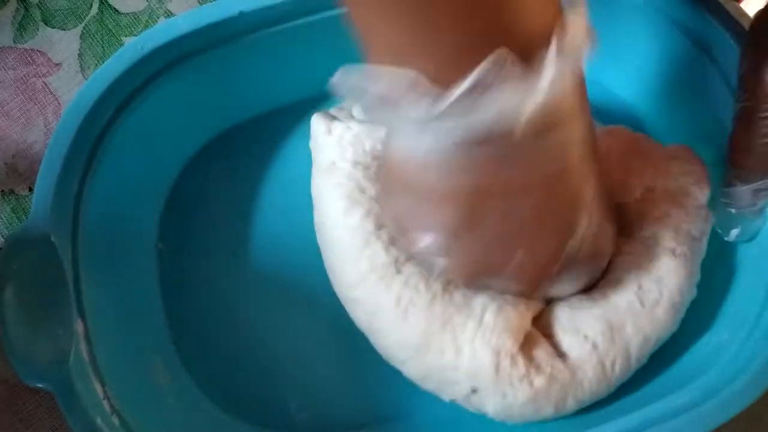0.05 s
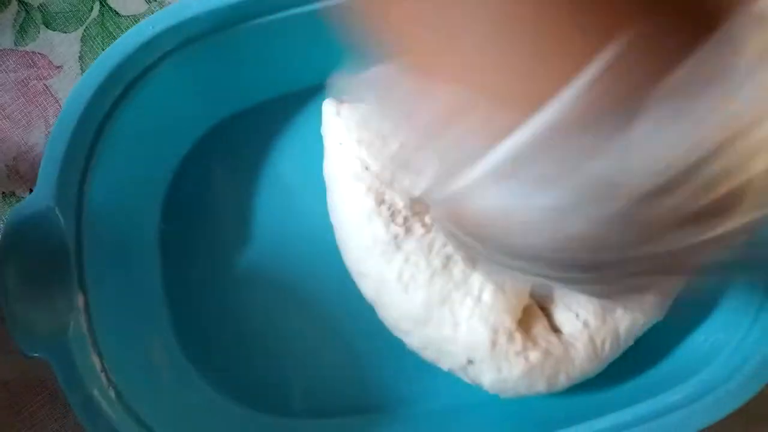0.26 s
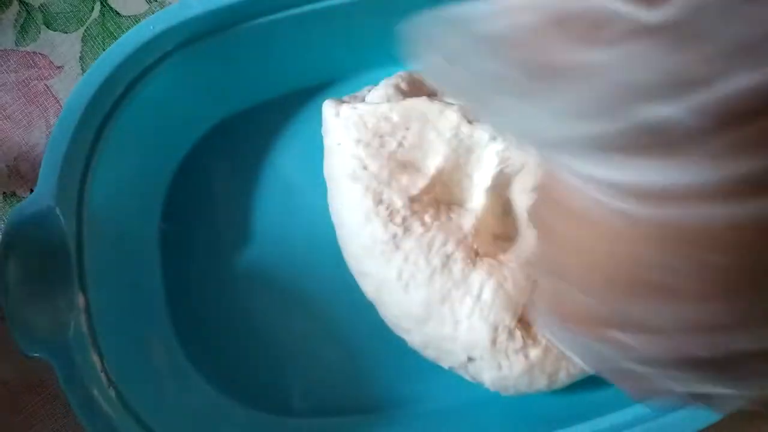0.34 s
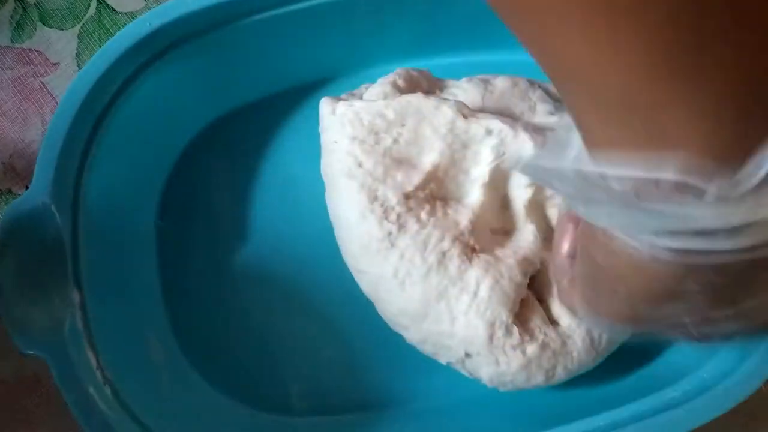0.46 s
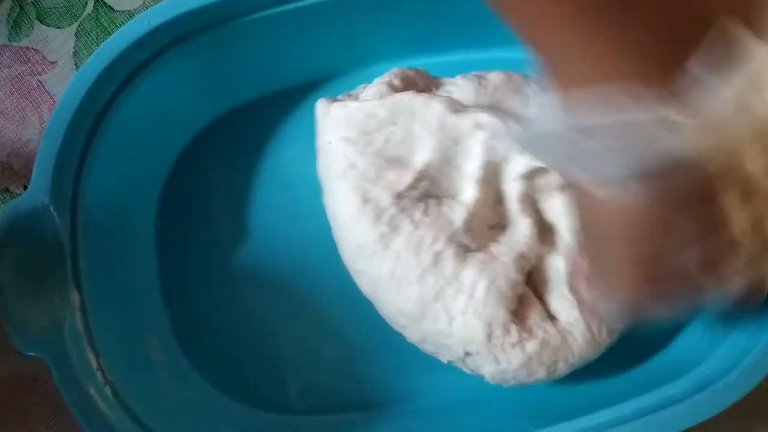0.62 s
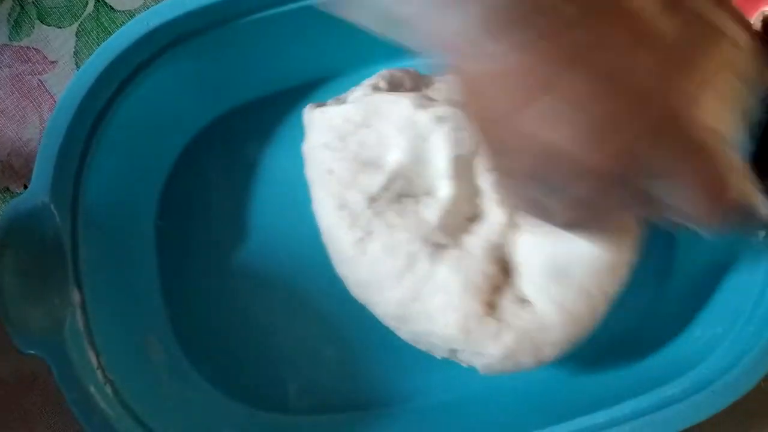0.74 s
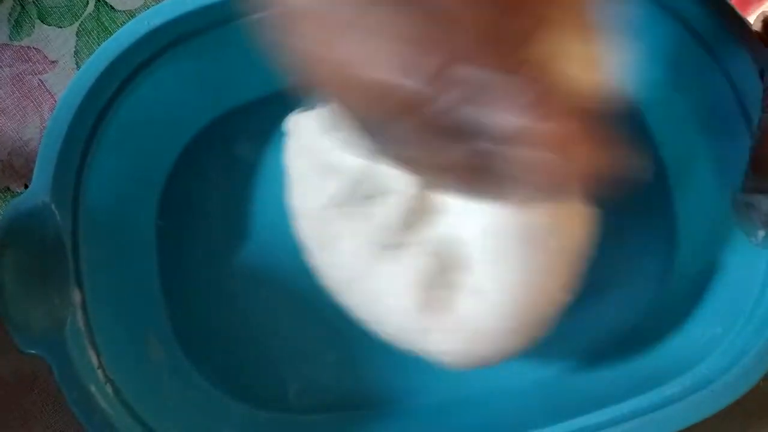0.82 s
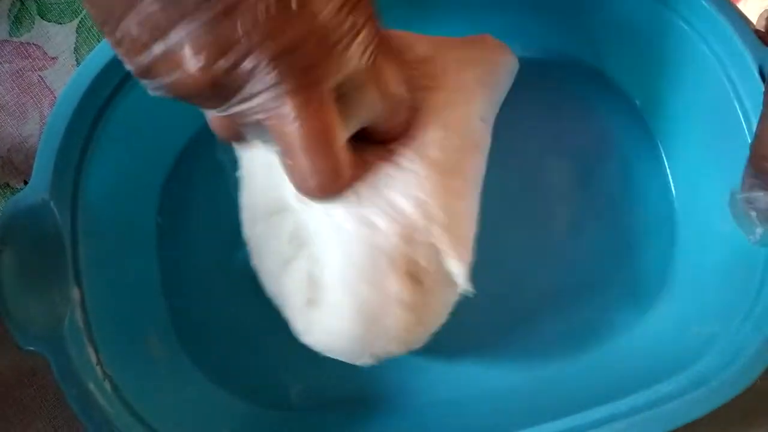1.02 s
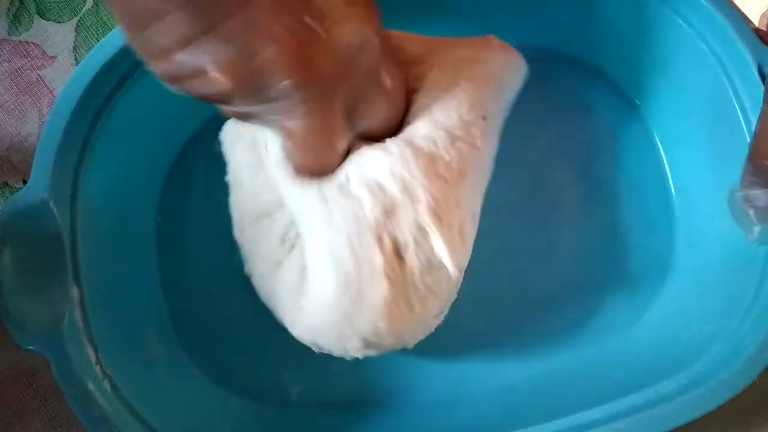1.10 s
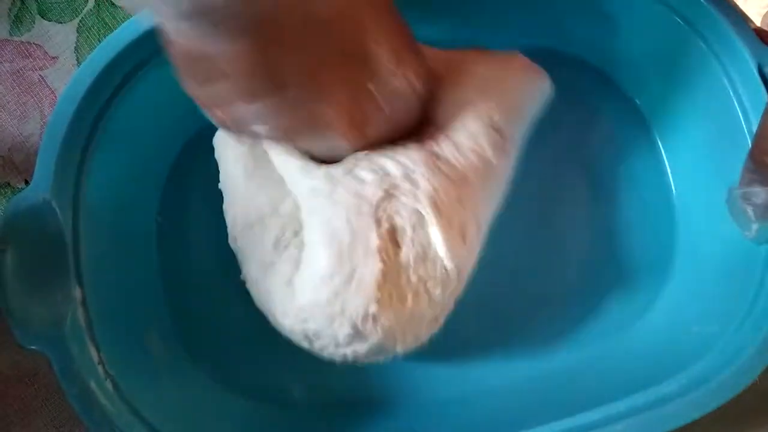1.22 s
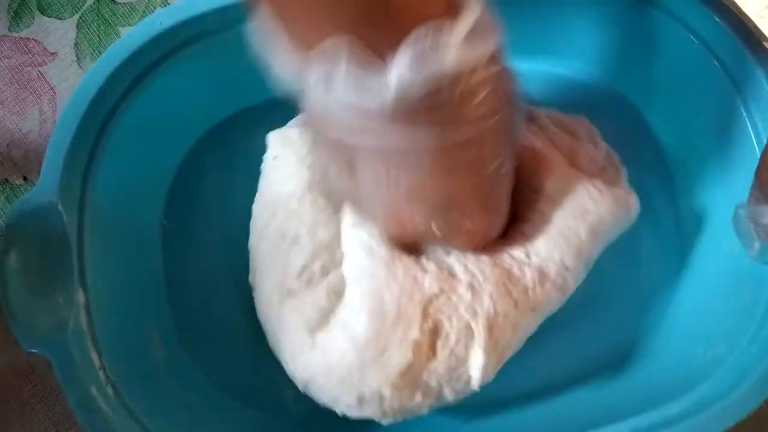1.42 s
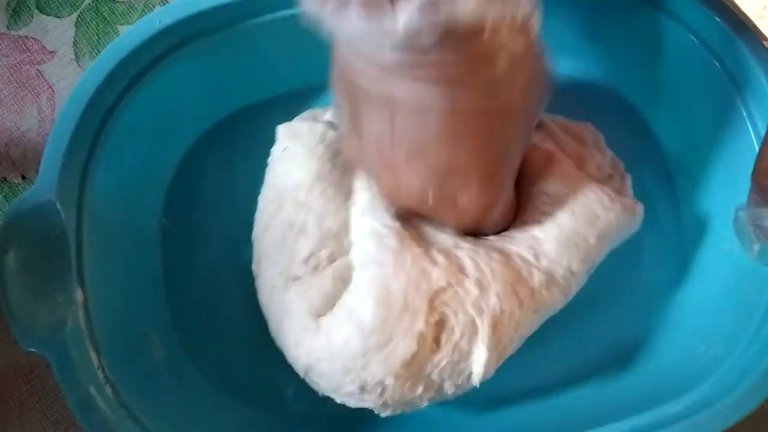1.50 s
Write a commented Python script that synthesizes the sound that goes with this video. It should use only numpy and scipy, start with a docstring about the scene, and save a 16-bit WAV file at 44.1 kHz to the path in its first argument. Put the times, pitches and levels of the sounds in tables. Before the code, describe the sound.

A gloved hand kneads dough, plastic rustling as the tub knocks hard, then softly.

```python
"""Kneading dough in a plastic tub

A hand in a thin plastic glove works dough close by, in a small quiet room. The glove crinkles as
its film buckles, and the tub knocks down twice, hard then softly, ringing in its damped modes.
The dough rubs by stick-slip friction, smacks as it comes unstuck and gives dully under the fist.
The glove rustles over it; a low rumble and a faint hum lie behind."""
import sys
import numpy as np
from scipy import signal
from scipy.fft import rfft, irfft
from scipy.io import wavfile

SR = 44100
rng = np.random.default_rng(int(sys.argv[2]) if len(sys.argv) > 2 else 0)


def generate_wav(signal):
    """Clip the signal to [-1, 1] and save it as 16-bit WAV at the path in sys.argv[1]."""
    frames = np.transpose(np.atleast_2d(signal))
    scaled = np.clip(frames, -1, 1) * 32767
    pcm = np.round(scaled).astype(np.int16)
    wavfile.write(sys.argv[1], SR, pcm)


N = 68355

# Levels are relative; a pan is the left level minus the right.
# tub contacts: (time [s], force level [dB], brightness [Hz], slap level [dB], settling delay [s])
KNOCKS = [(.2407, -5.5, 1130, -15.5, .0062), (.486, -34, 330, -65, .005), (0.5005, -14, 253, -42, .0102)]
# modes of the loaded tub: (frequency [Hz], level [dB], T60 [s])
TUB_MODES = [(75.2, -22, 0.1), (91.8, -27, 0.089), (109.6, -26.5, 0.14), (152.7, -21, 0.13),
             (221.4, -9.5, 0.12), (266, -16, 0.086), (305, -25.5, .04), (427.3, -27.5, 0.081),
             (512.3, -16, 0.052), (676.6, -13, 0.057), (767, -15.5, 0.038), (860, -34, 0.064),
             (993, -15.5, 0.025), (1370, -23, .022)]
# slap of the tub's bottom: (frequency [Hz], level [dB])
SLAP_SPECTRUM = [(200, -22.5), (600, -10.5), (1000, -2.5), (1400, -1.5), (1650, -21), (2100, -16),
                 (2700, -20.5), (3400, -35.5), (7000, -47), (15000, -61)]
# buckling runs of the glove: (time [s], level [dB], hold [s], low edge [Hz], high edge [Hz])
CRINKLES = [(.041, -45.5, 0.014, 202, 2040), (0.1217, -49, .001, 3980, 12000),
            (0.127, -30.5, 0.0015, 4860, 9500), (0.137, -40, 0.0031, 300, 4050),
            (0.144, -41.5, 0.0028, 1530, 7000), (.164, -40.5, 0.0034, 1000, 6800),
            (0.1956, -35, 0.0013, 4530, 11100), (0.2062, -30.5, 0.0079, 1250, 4940),
            (0.228, -36.5, 0.0026, 1490, 5460), (0.259, -53.5, 0.019, 3060, 9250),
            (0.94, -62.5, .01, 4540, 5470), (1.242, -57, 0.0053, 4450, 10700),
            (1.266, -58.5, .006, 4500, 9350), (1.356, -54, 0.00084, 3000, 7200),
            (1.3964, -42, 0.0013, 1830, 5040)]
# buckling film: (frequency [Hz], level [dB])
CRINKLE_SPECTRUM = [(300, -18), (1300, 8.5), (2000, 15.5), (2800, 8), (3500, 2), (5500, 2.5), (7700, 7.5),
                    (9200, 1.5), (11000, 0.5), (15000, -21)]
# envelope of the glove's rustle: (time [s], level [dB])
RUSTLE_ENVELOPE = [(0, -68.5), (.03, -81), (.055, -60), (.09, -49.5), (.14, -53), (.18, -51), (.225, -46.5),
                   (.275, -60.5), (.298, -86), (.315, -95), (.33, -62.5), (.38, -57.5), (.403, -65),
                   (.417, -98), (.452, -82), (.47, -64.5), (.5, -55), (.55, -59.5), (.635, -51),
                   (.69, -60.5), (.79, -55), (.872, -64.5), (.892, -83), (.928, -84), (.942, -72.5),
                   (1.02, -64.5), (1.09, -57), (1.16, -63.5), (1.18, -82), (1.21, -70), (1.255, -68),
                   (1.29, -83), (1.32, -75), (1.35, -62.5), (1.4, -61), (1.44, -64), (1.455, -93),
                   (1.495, -78), (1.52, -59), (1.55, -59.5)]
# rustling film: (frequency [Hz], level [dB])
RUSTLE_SPECTRUM = [(1200, -11), (2500, -3), (3600, -5.5), (5000, -3.5), (6600, -2.5), (7800, 3.5),
                   (8800, -6), (10500, -7), (12000, -20.5), (15500, -19)]
# stereo balance of the glove: (frequency [Hz], pan [dB])
GLOVE_PAN = [(500, -5), (1500, 1.5), (2500, 12.5), (5000, 12), (6500, 9), (8200, 16), (10000, -7.5),
             (15000, 1.5)]
# how hard the dough rubs on the tub: (time [s], level [dB])
RUB_ENVELOPE = [(0, -53.5), (.03, -61), (.06, -45), (.2, -46.5), (.3, -57.5), (.36, -50.5), (.44, -65),
                (.51, -46), (.6, -54), (.645, -49), (.69, -53), (.785, -44.5), (.83, -53), (.89, -88),
                (1, -63.5), (1.2, -58.5), (1.33, -54), (1.37, -46), (1.41, -43), (1.48, -61.5),
                (1.55, -54.5)]
# rubbing dough: (frequency [Hz], level [dB])
RUB_SPECTRUM = [(100, 3.5), (300, 2.5), (480, -3.5), (680, 5), (900, -2), (1400, 4), (2150, -4),
                (2900, -11.5), (6000, -35.5), (15000, -47)]
# the dough comes unstuck: (time [s], level [dB], hold [s])
SMACKS = [(0.125, -48, 0.018), (0.602, -60, 0.0017), (0.638, -48.5, 0.0029), (0.651, -48, 0.0048),
          (0.73, -54, .004), (0.7888, -43.5, 0.009), (0.803, -53.5, 0.0028), (0.852, -51.5, 0.0052),
          (1.001, -60, 0.006), (1.2925, -52, 0.0017), (1.392, -49, 0.0036)]
# peeling dough: (frequency [Hz], level [dB])
SMACK_SPECTRUM = [(200, -1), (500, -15), (750, -0.5), (1200, 7), (1700, -7.5), (2600, -15), (6000, -32),
                  (15000, -50)]
# pushes of the fist: (peak time [s], level [dB], half width [s])
PRESSES = [(0.131, -46, 0.015), (0.323, -43.5, 0.018), (0.802, -57.5, 0.02), (1.044, -58, 0.04),
           (1.231, -55, 0.02), (1.425, -53.5, 0.033)]
# yielding dough: (frequency [Hz], level [dB])
PRESS_SPECTRUM = [(30, -17.5), (60, 8), (130, -4), (220, -2), (330, -13), (600, -23), (2000, -62.5)]
# reverberant tail: (frequency [Hz], level [dB])
ROOM_SPECTRUM = [(50, -15), (120, -7.5), (230, -5.5), (400, 2.5), (750, -10.5), (1500, -6.5), (4000, -8),
                 (12000, -20)]
# ambient rumble and hush: (frequency [Hz], level [dB])
AMBIENT_SPECTRUM = [(20, -23), (35, 0.5), (52, 2.5), (100, -5.5), (150, -8.5), (250, -18.5), (420, -17),
                    (700, -27), (2250, -30), (3100, -53.5), (8000, -65.5), (15000, -58)]
# bands of the hum: (frequency [Hz], bandwidth [Hz], level [dB])
HUM_BANDS = [(414, 11, -72.5), (1507, 72, -74)]
# stereo balance of dough, slap and room: (frequency [Hz], pan [dB]); signs of left and right
TUB_PAN, SIDES = [(200, 1), (1200, -1), (3000, 6)], np.array([[1], [-1]])


def tub_knocks(settle_db=7.5, settle_hz=88, pan_db=-3):
    """Modal resonance: each impact, then the dough's settling weight, drives the tub's damped modes."""
    force = sum(impact(start, db, hz) + impact(start + delay, db + settle_db, settle_hz)
                for start, db, hz, _, delay in KNOCKS)
    ringing = 0
    for hz, db, t60 in TUB_MODES:
        radius = from_db(-60 / (t60 * SR))  # decay per sample
        pole_real = radius * np.cos(2 * np.pi * hz / SR)
        mode = signal.lfilter([1, -pole_real], [1, -2 * pole_real, radius ** 2], force)
        ringing = ringing + from_db(db) * mode
    return ringing * from_db(SIDES * pan_db / 2)


def impact(start, db, bright_hz):
    """Contact force: the softer the contact, the longer the pulse and the duller its spectrum."""
    impulse = np.zeros(N)
    impulse[int(start * SR)] = -from_db(db)
    return low_pass(impulse, bright_hz)


def tub_slap(t60=0.022):
    """Impact noise: the flat bottom radiates a brief broadband transient as it lands."""
    envelope = sum(from_db(db) * burst(start, 0, t60 / np.log(1000)) for start, _, _, db, _ in KNOCKS)
    slap = colour(envelope * rng.choice([-1, 1], (2, N)), SLAP_SPECTRUM)
    return place(slap, TUB_PAN, likeness=0.8)


def glove(release_s=0.0017):
    """Buckling: thin film sheds elastic energy in snaps, as a fine rustle and in short, louder runs."""
    snaps = grains(per_s=5500, spread_db=2.5)
    crinkles = 0
    for start, db, hold, low_hz, high_hz in CRINKLES:
        run = snaps * from_db(db) * burst(start, hold, release_s)
        crinkles = crinkles + high_pass(low_pass(run, high_hz), low_hz)
    rustle = grains(per_s=12000, spread_db=5.5) * along(RUSTLE_ENVELOPE) * from_db(-6.5)
    film = colour(crinkles, CRINKLE_SPECTRUM) + colour(rustle, RUSTLE_SPECTRUM)
    return place(film, GLOVE_PAN, likeness=0.1)


def sticky_dough(release_s=0.0039):
    """Stick-slip friction and adhesion: dough rubs in tiny slips and peels off in bursts of pops."""
    slips = grains(per_s=5000, spread_db=3) * along(RUB_ENVELOPE) * from_db(-7)
    peeling = sum(from_db(db) * burst(start, hold, release_s) for start, db, hold in SMACKS)
    pops = grains(per_s=6000, spread_db=2.5) * peeling
    dough = colour(slips, RUB_SPECTRUM) + colour(pops, SMACK_SPECTRUM)
    return place(dough, TUB_PAN, likeness=0.52)


def fist_presses():
    """Viscous damping: dough yields under the fist with a dull swell of noise and does not ring."""
    weight = sum(from_db(db) * np.exp(-((seconds() - peak) / half) ** 2) for peak, db, half in PRESSES)
    return colour(weight * rng.standard_normal(N), PRESS_SPECTRUM)


def reverberation(direct, t60=0.13, delay_s=0.01, level_db=-18.5):
    """Diffuse reflection: the room adds an exponentially decaying tail, partly alike in the two ears."""
    decay = burst(delay_s, 0, t60 / np.log(1000))
    tail = colour(rng.standard_normal((2, N)) * decay, ROOM_SPECTRUM)
    tail /= np.sqrt(np.sum(tail ** 2, axis=1, keepdims=True))
    response = place(tail, TUB_PAN, likeness=0.58)
    return from_db(level_db) * signal.fftconvolve(direct, response, axes=1)[:, :N]


def ambient_noise(level_db=-54.5):
    """Diffuse-field coherence: the long waves of the rumble reach both ears alike, the hush less so."""
    mid, side = colour(rng.standard_normal((2, N)), AMBIENT_SPECTRUM)
    side = high_pass(side, 450, order=1)
    return from_db(level_db) * (mid + 0.82 * side * SIDES)


def hum():
    """Narrow-band noise: neighbouring frequencies beat, so each faint tone wavers."""
    tones = 0
    for hz, width, db in HUM_BANDS:
        tone = signal.lfilter(*signal.iirpeak(hz, hz / width, fs=SR), rng.standard_normal((2, N)))
        tones = tones + from_db(db) * tone / tone.std()
    return tones


def grains(per_s, spread_db):
    """Shot noise: two independent streams of random clicks of uneven size, at unit rms."""
    sizes = from_db(spread_db * np.minimum(rng.exponential(1, (2, N)), 4))
    signs = rng.choice([-1, 1], (2, N))
    clicks = sizes * signs * (rng.random((2, N)) < per_s / SR)
    return clicks / clicks.std()


def burst(start, hold, release):
    """Exponential decay after a sudden onset and a hold."""
    age = seconds() - start
    return (age >= 0) * np.exp(-np.maximum(age - hold, 0) / release)


def place(pair, pan, likeness):
    """Interaural cues: two independent signals are partly correlated, then panned band by band."""
    stereo = (np.sqrt(1 + likeness) * pair[0] + np.sqrt(1 - likeness) * pair[1] * SIDES) / np.sqrt(2)
    return irfft(rfft(stereo, 2 * N) * from_db(SIDES * at_hz(pan) / 2))[:, :N]


def colour(x, spectrum):
    """Minimum-phase filtering to a spectral shape; white noise keeps its power."""
    gain = from_db(at_hz(spectrum))
    gain /= np.sqrt(np.mean(gain ** 2))
    cepstrum = irfft(np.log(gain))
    causal_fold = np.r_[1, np.full(N - 1, 2), 1, np.zeros(N - 1)]
    response = np.exp(rfft(cepstrum * causal_fold))
    return irfft(rfft(x, 2 * N) * response)[..., :N]


def low_pass(x, hz):
    """Second-order treble roll-off."""
    return signal.sosfilt(signal.butter(2, hz, fs=SR, output="sos"), x + 1e-18)


def high_pass(x, hz, order=2):
    """Bass roll-off of 6 dB per octave for each order."""
    return signal.sosfilt(signal.butter(order, hz, "high", fs=SR, output="sos"), x)


def at_hz(points):
    """Log-frequency interpolation onto the bins of a 2N-point transform."""
    hz, value = np.transpose(points)
    bin_hz = np.arange(N + 1) * SR / (2 * N)
    return np.interp(np.log(bin_hz + 1), np.log(hz), value)


def along(envelope):
    """Interpolation in decibels, giving a gain for each sample."""
    return from_db(np.interp(seconds(), *np.transpose(envelope)))


def from_db(db):
    """Amplitude ratio of a level."""
    return 10 ** (np.asarray(db) / 20)


def seconds():
    """Sampling instants."""
    return np.arange(N) / SR


def scene():
    """Superposition: the direct sound of tub, glove and dough adds to reverberation and background."""
    direct = tub_knocks() + tub_slap() + glove() + sticky_dough() + fist_presses()
    return direct + reverberation(direct) + ambient_noise() + hum()


def record(dry, bass_cut_hz=42, treble_cut_hz=15900):
    """Band limiting: the microphone loses the deepest bass, and the top treble is cut steeply."""
    treble_cut = signal.ellip(10, 0.1, 80, treble_cut_hz, fs=SR, output="sos")
    return signal.sosfilt(treble_cut, high_pass(dry, bass_cut_hz))


dry = scene()
out = record(dry)
generate_wav(out)
```